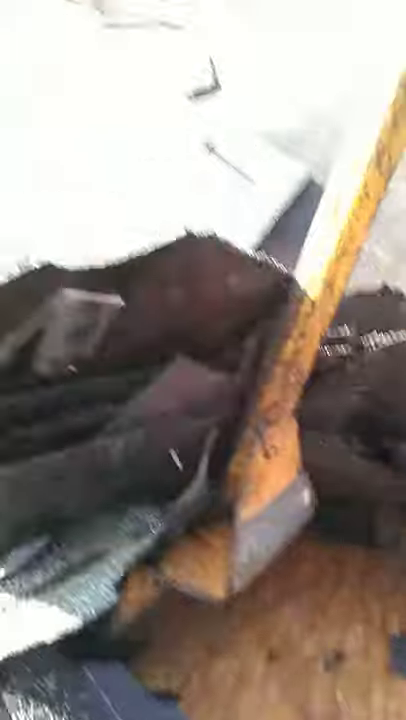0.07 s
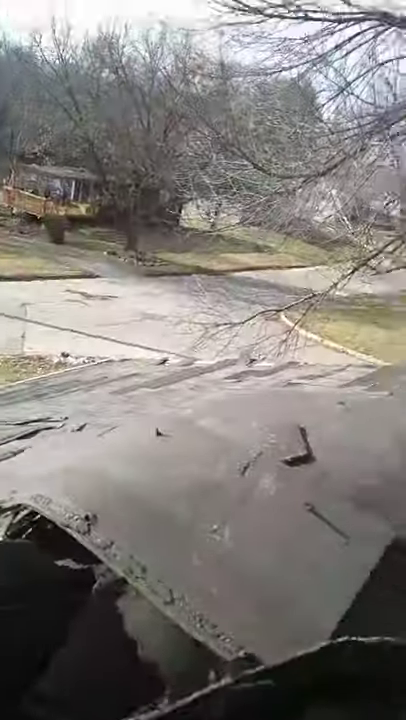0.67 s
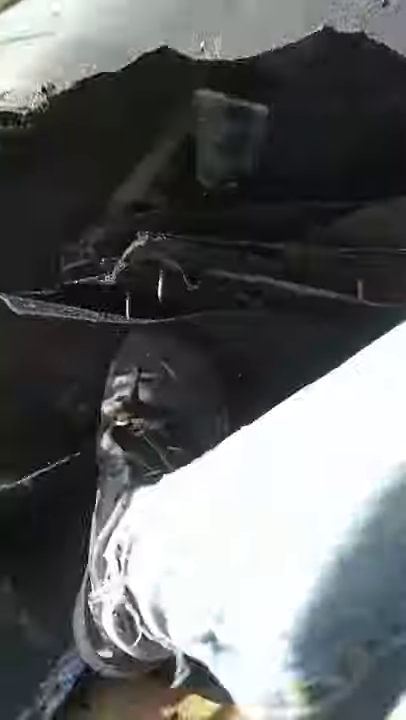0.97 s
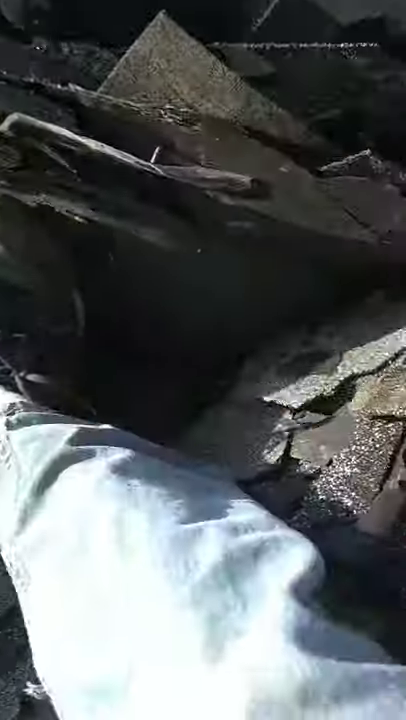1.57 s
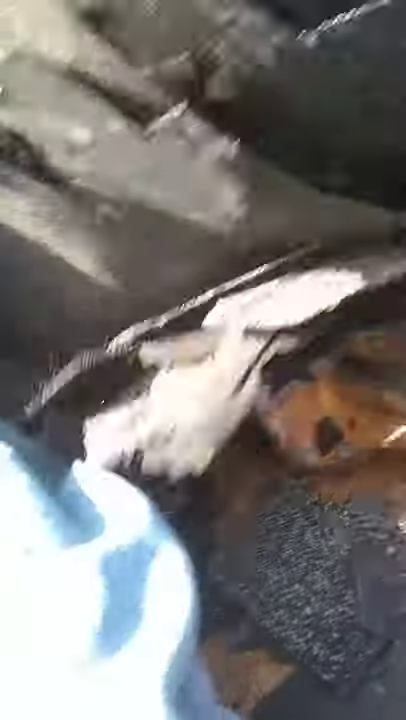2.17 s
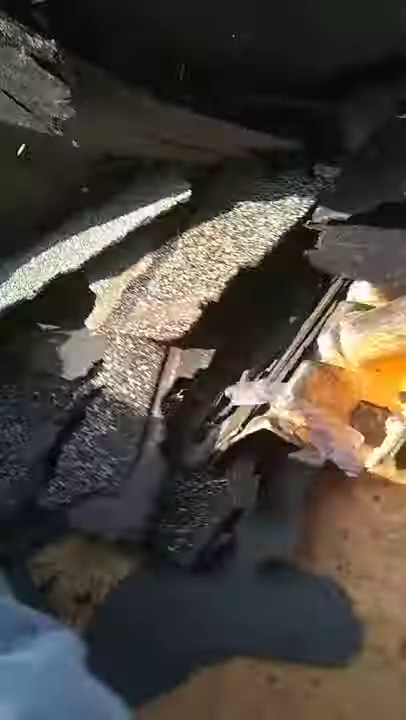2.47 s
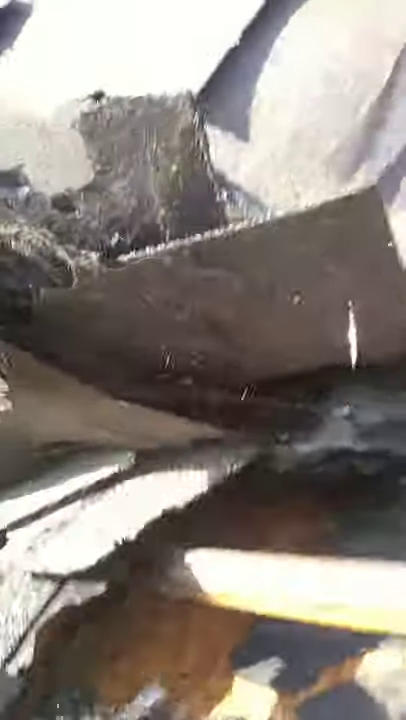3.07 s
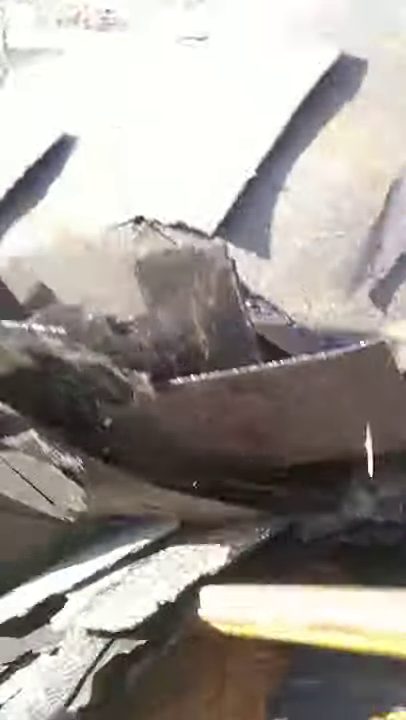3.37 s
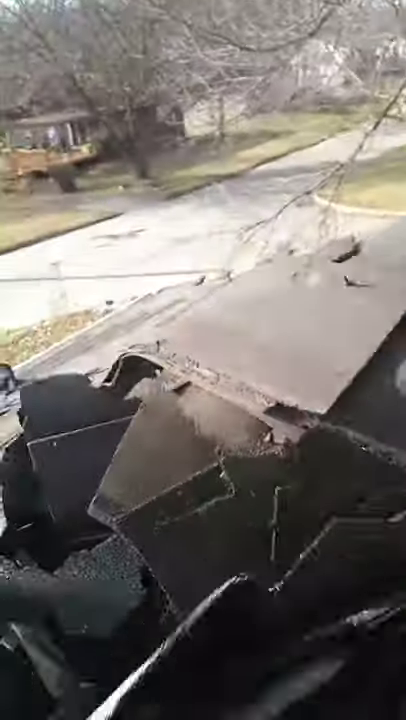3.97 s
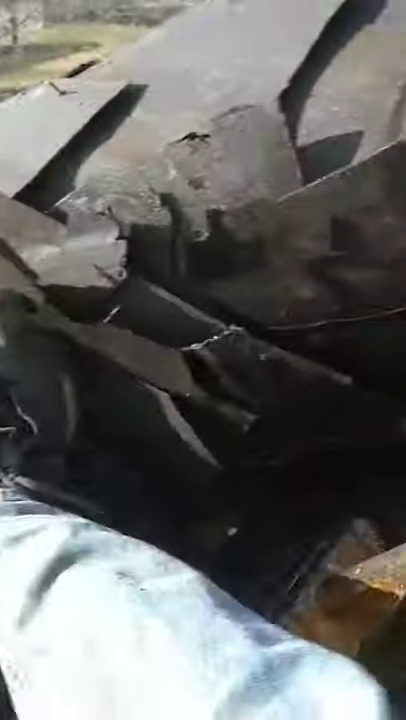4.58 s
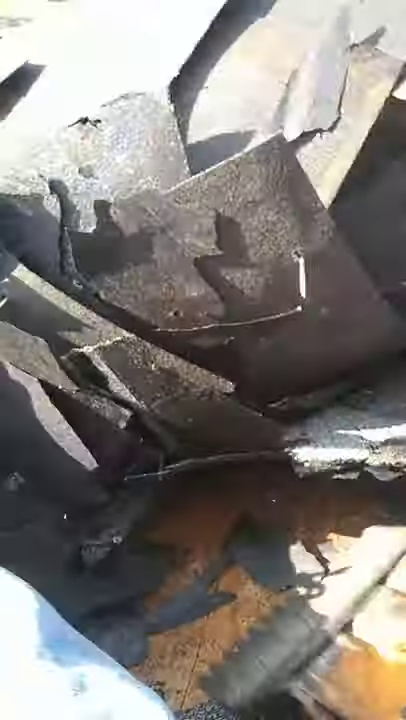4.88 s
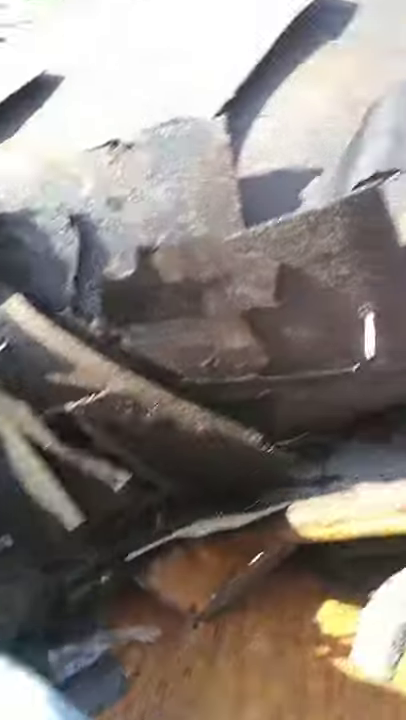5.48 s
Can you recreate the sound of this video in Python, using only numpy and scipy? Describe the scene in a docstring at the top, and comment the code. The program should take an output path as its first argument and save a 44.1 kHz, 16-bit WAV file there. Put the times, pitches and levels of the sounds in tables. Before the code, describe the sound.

Close by, boots scuff and boards thud while a spade rasps under roof shingles, tearing and snapping them and knocking on wood.

```python
"""Old asphalt shingles are pried off a wooden roof deck with a steel spade, close by and outdoors.
First come light shoves, while boots scuff over loose shingles, a mat slides and the boards thud.
From 1.7 s the spade digs in: each shove bites, sticks and slips, and lets go. Mats flex, tear and snap,
grit rasps, and the tool knocks on the deck, hardest near 3.5 s. The blade chatters around 4.6 s, and after
a lull a nail rings at 5.5 s. Two microphone ports of opposite polarity pick up the rubbing and cracking."""
import sys
import numpy as np
from scipy import signal
from scipy.fft import rfft, irfft, next_fast_len
from scipy.io import wavfile
from scipy.ndimage import uniform_filter1d

SR = 44100
rng = np.random.default_rng(int(sys.argv[2]) if len(sys.argv) > 2 else 0)


def wav_out(sig):
    """Save sig, one row per channel (or a flat mono array), as 16-bit PCM at SR to the path in sys.argv[1]."""
    wavfile.write(sys.argv[1], SR, np.round(np.clip(np.atleast_2d(sig).T, -1, 1) * 32767).astype(np.int16))


N = 248724
TIME = np.arange(N) / SR
FFT_SIZE = next_fast_len(N + 4096)
BIN_HZ = np.maximum(np.arange(FFT_SIZE // 2 + 1) * SR / FFT_SIZE, 1)

# shingles snapping: (time [s], grit tick [dB], felt crunch [dB])
SHINGLE_SNAPS = [(0.033, -23, -47), (0.055, -20.5, -40), (0.093, -30, -35), (0.107, -26, -34),
                 (0.12, -23, -36), (.127, -29, -40), (.836, -31, -25), (0.939, -24, -21), (.990, -30, -12),
                 (1.001, -32, -11), (1.017, -27, -20), (1.2018, -19, -41), (1.339, -39, -34),
                 (1.400, -29, -34), (1.471, -26, -20), (1.6708, -23, -22), (1.69, -12.5, -9.5),
                 (1.723, -15, -17), (1.7402, -22, -12), (1.835, -23, -28), (1.8453, -25, -30),
                 (2.012, -33, -23), (2.058, -35, -14), (2.154, -34, -23), (2.185, -23, -15),
                 (2.2013, -28, -17), (2.2452, -42, -13.5), (2.3255, -35, -34), (2.3705, -32, -31),
                 (2.386, -24, -36), (2.4275, -22, -37), (2.466, -16.5, -22), (2.569, -15.5, -12.5),
                 (2.582, -15, -15), (2.6221, -12, -31), (2.6467, -28, -6), (2.6634, -27, -8),
                 (2.702, -28, -19), (2.821, -26.5, -20), (2.9031, -21, -14), (2.9186, -24.5, -13),
                 (2.9395, -29, -23), (3.036, -28, -21), (3.08, -29, -8), (3.097, -21.5, -24),
                 (3.13, -20.5, -13), (3.171, -34, -10), (3.276, -41, -36), (3.295, -33, -42),
                 (3.393, -21.5, -36), (3.409, -30, -36), (3.43, -32, -35), (3.482, -26, -41),
                 (3.7297, -29.5, -21.5), (3.9164, -22, -30), (4.0432, -22, -20), (4.0818, -12.5, -12.5),
                 (4.175, -27, -30), (4.2025, -28, -34), (4.3067, -23, -13), (4.317, -23.5, -12),
                 (4.345, -32, -23), (4.421, -18.5, -15), (4.4345, -30, -30), (4.514, -17, -31),
                 (4.578, -41, -14), (4.612, -36, -5.5), (4.652, -37, -9.5), (4.682, -32, -12),
                 (4.7033, -16, -22), (4.845, -20.5, -15), (4.9408, -10.5, -24), (5.0287, -20, -24),
                 (5.086, -34, -21), (5.481, -18.5, -42), (5.525, -32.5, -54), (5.6266, -16, -14)]


def from_db(db):
    """Decibels as a gain."""
    return 10 ** (np.asarray(db) / 20)


def rms_one(x):
    """Scale a signal to rms 1."""
    return x / np.sqrt(np.mean(x ** 2) + 1e-20)


def level_curve(points):
    """A fader ride in dB, as a gain per sample."""
    return from_db(np.interp(TIME, *np.transpose(points)))


def per_bin(points):
    """A table over frequency, joined on a log axis."""
    hz, value = np.transpose(points)
    return np.interp(np.log(BIN_HZ), np.log(hz), value)


def coloured(x, spectrum):
    """Shape a white signal by a spectrum, keeping its power."""
    gain = rms_one(from_db(per_bin(spectrum)))
    return irfft(rfft(x, FFT_SIZE) * gain, FFT_SIZE)[..., :N]


def resonate(x, hz, width_hz):
    """One resonance with gain 1 at its peak."""
    r = np.exp(-np.pi * width_hz / SR)
    poles = [1, -2 * r * np.cos(2 * np.pi * hz / SR), r * r]
    return signal.lfilter(np.array([1, 0, -1]) * (1 - r * r) / 2, poles, x)


def ring_modes(x, modes):
    """Drive a bank of resonances side by side."""
    return sum(from_db(db) * resonate(x, hz, width_hz) for hz, width_hz, db in modes)


def struck(start, hz, db, t60):
    """A sine that starts suddenly and dies away, cut off after 0.2 s."""
    out = np.zeros(N)
    first = int(start * SR)
    age = TIME[:min(N - first, SR // 5)]
    envelope = from_db(db) * np.exp(-np.log(1000) * age / t60)
    out[first:first + len(age)] = envelope * np.sin(2 * np.pi * hz * age)
    return out


def fade(clicks, t60):
    """Every click starts an exponential decay."""
    return signal.lfilter([1], [1, -from_db(-60 / (t60 * SR))], clicks + 1e-18)


def bursts(times, levels_db, t60):
    """Envelope of sudden releases that die away."""
    clicks = np.zeros(N)
    clicks[np.clip(np.round(times * SR).astype(int), 0, N - 1)] = from_db(levels_db)
    return fade(clicks, t60)


def snapping(times, levels_db, t60, rise_s=0.0036):
    """Envelope of breaks that take a moment to spread across the mat, then die away."""
    return fade(bursts(times, levels_db, t60), rise_s) * np.log(1000) / (rise_s * SR)


def stroke(start, length):
    """Envelope of one smooth push."""
    return np.sqrt(np.abs(np.sin(np.pi * np.clip((TIME - start) / length, 0, 1))))


def wander(per_s):
    """A slow random path between -1 and 1."""
    knots = np.arange(0, TIME[-1] + 1, 1 / per_s)
    return np.interp(TIME, knots, rng.uniform(-1, 1, len(knots)))


def delayed(paths, lag_s):
    """Send each path through a moving delay."""
    return np.array([np.interp(TIME - lag_s, TIME, path) for path in paths])


def grains(per_s):
    """Tiny fractures at random moments, on four paths to the ports; power 1."""
    chance = np.clip(per_s / SR, .001, 1)
    return rng.standard_normal((4, N)) * (rng.random((4, N)) < chance) / np.sqrt(chance)


def stick_slip(per_s, spread_db, t60, steady):
    """Force of uneven slips on top of steady sliding; rms about 1."""
    sizes = from_db(spread_db * np.minimum(rng.exponential(1, N), 3))
    slips = rms_one(fade(sizes * (rng.random(N) < per_s / SR), t60))
    power = slips ** 2 + steady ** 2
    return np.sqrt(power / uniform_filter1d(power, size=2200))


def crackle(per_s, pops_per_s, pop_db, spread_db=1):
    """Dense fine grinding, with granules of uneven size cracking out of it."""
    sizes = from_db(spread_db * np.minimum(rng.exponential(1, N), 2))
    pops = rms_one(fade(sizes * (rng.random(N) < pops_per_s / SR), t60=0.0049))
    return grains(per_s) + from_db(pop_db) * pops * grains(20000)


def spade_shoves(attack_s=0.02, release_t60=0.084):
    """Each shove bites, swells or eases, and lets go: the drive on felt, coarse grit, fine grit, deck."""
    # (start [s], length [s], force [dB], swell [dB], grit [dB], fine over coarse [dB], deck bearing [dB])
    shoves = [ (0, 0.19, -37.5, -2, -1, -3.5, -12), (0.093, 0.025, -37.5, 3, 6.5, 14, -19),
              (0.19, 0.22, -41.5, -9, -3, -8, -5.5), (0.599, 0.26, -38.5, -0.5, 5.5, 5, -3.5),
              (0.88, 0.24, -36, 0.5, 2, -4.5, -2.5), (1.024, 0.079, -38, -4, -3, 7, -1),
              (1.141, 0.3, -34.5, -2, -1, -3, -7.5), (1.456, 0.19, -40, -2, -2, -5.5, -5),
              (1.658, 0.088, -27.5, 14, -1, -11.5, -10), (1.76, 0.039, -16.5, 1.5, -4.5, -6, -3),
              (1.801, 0.11, -51.5, 4, 0, -2, -3), (1.93, 0.039, -52, 11.5, 9.5, 2, 0),
              (2.02, 0.076, -32, 6.5, 3.5, 1.5, -9), (2.029, 0.18, -33, 4.5, -0.5, -2, -2),
              (2.264, 0.058, -35.5, 3.5, 2.5, -1.5, -10.5), (2.325, 0.07, -38.5, 11.5, -1, 0, -3),
              (2.415, 0.049, -30.5, 21.5, -6.5, -14, -6.5), (2.478, 0.066, -34, 1, -0.5, -8, -6.5),
              (2.571, 0.07, -31.5, 0.5, 1.5, -14, -3), (2.632, 0.068, -21.5, 10.5, -2.5, -8, -6),
              (2.701, 0.024, -20.5, -2, -1.5, -3, -2), (2.748, 0.15, -47, -13, -2, 2, -15),
              (2.9, 0.13, -39.5, -8, 0.5, -3, 1.5), (3, 0.2, -31, 0.5, 0, -3, -6.5),
              (3.24, 0.29, -36, 9, -3.5, -5.5, -6), (3.515, 0.22, -39, -3, -4, -6, -5),
              (3.75, 0.33, -40.5, 3, -2, -2.5, -9), (3.895, 0.041, -40, -1, 4, -4, -3),
              (4.049, 0.043, -28, 5, 0.5, 0.5, -13), (4.095, 0.28, -32.5, -7.5, -2, -4, -14.5),
              (4.296, 0.3, -33, 3.5, -7.5, -3.5, -6), (4.511, 0.23, -31.5, 14, -2.5, -7, -7),
              (4.704, 0.05, -35, -2, 6, 2, -12), (4.733, 0.13, -29, -4, -4, -5, -13),
              (4.869, 0.072, -28, 7.5, 0.5, -1, -0.5), (4.945, 0.067, -30, 5, 3.5, -6.5, -1),
              (5.007, 0.012, -17.5, -3.5, -6, -2.5, 4), (5.016, 0.075, -40, 5, -1, -10, -7),
              (5.099, 0.12, -53, -14, -0.5, -2, -10), (5.244, 0.054, -40, 8, 0, -4.5, -1),
              (5.45, 0.027, -50, -7, 0.5, 4, -11), (5.486, 0.0053, -38, -14.5, 11, 2, 2.5),
              (5.597, 0.031, -38, -3, 1.5, -11, 5)]
    power = np.zeros((4, N))
    for start, length, force_db, swell_db, grit_db, fine_db, bearing_db in shoves:
        span = slice(*np.searchsorted(TIME, [start - attack_s, start + length + release_t60]))
        age = TIME[span] - start
        bite = np.clip(age / attack_s + .5, 0, 1)
        hold_db = swell_db * (np.clip(age / length, 0, 1) - .5)
        release_db = -60 * np.maximum(age - length, 0) / release_t60
        shares = from_db([0, grit_db - fine_db / 2, grit_db + fine_db / 2, bearing_db])
        power[:, span] += np.outer(shares, bite * from_db(force_db + hold_db + release_db)) ** 2
    return np.sqrt(power)


def rasping_grit(coarse, fine):
    """Granules grind and pop against the blade; a snap crushes many at once, and crumbs trail after."""
    # tone of the coarse and of the fine grit: (frequency [Hz], level [dB])
    coarse_colour = [(1200, -18), (2300, 8.5), (2800, 12.5), (3500, -3), (4000, 5.5), (4500, 8.5),
                     (5600, 3.5), (6500, 2.5), (9000, -12)]
    fine_colour = [(4000, -29), (6500, 3), (8000, 3.5), (9000, 4), (10000, -2), (11300, 4.5), (12500, -4.5),
                   (14300, -11)]
    # the steel blade singing under the grit: (frequency [Hz], width [Hz], level [dB])
    blade_modes = [(3604, 325, 7.5), (4400, 22, 3.5), (5540, 45, -1), (9520, 440, 3.5), (10080, 140, 9)]
    times, tick_db, _ = np.transpose(SHINGLE_SNAPS)
    force = stick_slip(per_s=200, spread_db=4.0, t60=0.048, steady=1.43)
    grind = crackle(per_s=9000, pops_per_s=110, pop_db=-7.0) * force * from_db(-1.2)
    crack = snapping(times, tick_db, t60=0.0076) * from_db(-0.5)
    crumbs = snapping(times, tick_db, t60=0.05) * from_db(-7.5)
    crush = grains(16000) * (crack + crumbs)
    big = coloured(grind * coarse * from_db(-4.5) + crush * from_db(-4.0), coarse_colour)
    small = coloured(grind * fine * from_db(-2) + crush * from_db(-4.5), fine_colour)
    grit = big + small
    return grit + ring_modes(grit, blade_modes) * from_db(-1.0) + edge_rasp(grit)


def edge_rasp(grit, wander_s=0.001596):
    """The scraping edge picks one band out of the grit; its wandering path bends the pitch."""
    band = resonate(grit, hz=3453, width_hz=70)
    return from_db(13.5) * delayed(band, wander_s * wander(14))


def tearing_felt(tear):
    """Fibres give way in small clusters, and all at once in a snap."""
    # tone of the tearing: (frequency [Hz], level [dB])
    felt_colour = [(350, -5), (650, 1.5), (850, 2.5), (1250, 4.5), (1560, 4), (1900, 2), (2400, -4.5),
                   (3200, -4), (7000, -48)]
    times, _, crunch_db = np.transpose(SHINGLE_SNAPS)
    force = stick_slip(per_s=260, spread_db=1.5, t60=0.0093, steady=1.0)
    snap = snapping(times, crunch_db, t60=0.016) * from_db(-5.5)
    fibres = coloured(grains(5000) * (tear * force * from_db(-1.5) + snap), felt_colour)
    return hollow_gap(fibres, gap_s=.0022, echo=.45)


def hollow_gap(x, gap_s, echo):
    """The gap under a lifted mat adds a short echo whose notches shift as it bends."""
    lag_s = gap_s * (1 + .35 * wander(9))
    return (x + echo * delayed(x, lag_s)) / np.sqrt(1 + echo ** 2)


def deck_knocks():
    """Each blow is a crack and a short hollow ring whose pitch depends on where the blade bears."""
    # the tool hits the deck: (time [s], ring [dB], pitch [Hz], crack [dB], ring t60 [s])
    blows = [(0.09, -9, 560, -33, 0.014), (0.477, -8.5, 450, -31.5, 0.033), (0.94, -8.5, 550, -38, 0.029),
             (1.783, -8, 540, -14.5, 0.026), (1.7961, -3, 573, -26, 0.094), (2.0104, -6, 666, -29, 0.013),
             (2.6865, -7, 587, -17.5, 0.18), (2.702, -4, 534, -24, 0.023), (3.009, -5.5, 530, -46, 0.033),
             (3.038, -10, 635, -35, .02), (3.0538, -11.5, 593, -38, 0.032), (3.135, -6.5, 422, -40, 0.0095),
             (3.1474, -10.5, 625, -34, 0.015), (3.1718, -13, 524, -42, 0.015),
             (3.511, -16, 536, -14.5, 0.17), (3.518, 1.5, 550, -13, 0.058), (3.628, -3.5, 590, -8, 0.074),
             (4.635, -10.5, 640, -29, 0.044), (5.0057, -3, 547, -23, 0.063), (5.456, -23, 895, -45, 0.02),
             (5.606, -5.5, 511, -25, 0.079)]
    # partials of a knock: (multiple of its pitch, level [dB], share of its ring time)
    modes = [(.5, -25, 1), (1.0, -1.5, 0.65)]
    # tone of the crack: (frequency [Hz], level [dB])
    crack_colour = [(100, -0.5), (400, 7.5), (950, 6.5), (1700, 3.5), (3500, -1.0), (6000, -2.5),
                    (9000, -5.5), (14000, -18.0)]
    ring = sum(struck(start, hz * multiple, db + mode_db, t60 * share)
               for start, db, hz, _, t60 in blows for multiple, mode_db, share in modes)
    low_cut = signal.butter(2, 210, "high", fs=SR, output="sos")   # the ring carries no deep bass
    times, _, _, crack_db, _ = np.transpose(blows)
    crack = grains(20000) * bursts(times, crack_db + 4, t60=.025)
    return coloured(crack, crack_colour), signal.sosfilt(low_cut, ring + 1e-18)


def boards_and_mats(bearing):
    """Shifting weight thumps the boards and, with the bearing spade, flexes the mats; thuds jolt both."""
    # weight shifting on the loose shingles: (time [s], level [dB])
    weight_ride = [(0, -52), (.06, -24), (.17, -33), (.27, -22.5), (.39, -25.5), (.52, -20), (.66, -27),
                   (.8, -21.5), (.9, -29), (1.17, -37.5), (1.45, -30), (1.72, -32.5), (1.9, -40.5),
                   (2.08, -33), (2.82, -41), (3.05, -41.5), (3.64, -29), (3.77, -43.5), (4.3, -43.5),
                   (4.9, -43), (5.17, -51.5), (5.6, -41)]
    # the boards give: (time [s], level [dB])
    thuds = [(0.058, -27), (0.227, -26), (0.421, -25), (.515, -28), (0.553, -31), (0.879, -16),
             (0.937, -20), (1.074, -14), (1.112, -15.5), (1.442, -14.5), (1.589, -23.5), (1.695, -28),
             (1.793, -9.5), (2.004, -17), (2.452, -22), (2.515, -25), (2.724, -15.5), (2.884, -17.5),
             (2.934, -19.5), (3.362, -22), (3.648, -15.5), (4.34, -27), (5.008, -13), (5.244, -23.5)]
    # tone of the boards and of the mats: (frequency [Hz], level [dB])
    board_colour = [(15, -29), (40, -7), (90, 0.5), (170, 1.5), (250, -15), (400, -10.5), (900, -56)]
    mat_colour = [(100, -42), (200, -1.5), (290, -7.5), (400, -10), (480, -14.5), (700, -22), (1200, -34.5),
                  (3000, -46.5)]
    # the tool ringing against the deck: (frequency [Hz], width [Hz], level [dB])
    deck_modes = [(132, 103, -3.5), (277, 63.5, 3), (492, 109, 0), (558, 45, -7.5), (689, 126, -8.5)]
    weight = level_curve(weight_ride)
    force = stick_slip(per_s=150, spread_db=0.5, t60=0.044, steady=0.51)
    jolt = bursts(*np.transpose(thuds), t60=0.14)
    thump = force * weight * from_db(1)
    flex = force * np.hypot(weight * from_db(0.5), bearing * from_db(-9))
    press = force * np.hypot(weight * from_db(-1.5), bearing * from_db(20.5))
    boards = coloured(grains(8000) * np.hypot(thump, jolt), board_colour)
    mats = coloured(grains(6000) * np.hypot(flex, jolt * from_db(-1)), mat_colour)
    slips = grains(3000)[0] * np.hypot(press, jolt * from_db(-7.5))
    return boards + mats, ring_modes(slips, deck_modes)


def nail_pings():
    """The blade catches a nail and it rings briefly."""
    # partials of steel on nail: (time [s], frequency [Hz], level [dB], t60 [s])
    pings = [(1.6917, 9730, -13, .025), (1.741, 9950, -14.5, 0.064), (1.790, 3110, -19, 0.038),
             (3.5185, 1400, -9.5, 0.015), (3.629, 1590, -10, 0.023), (3.631, 1150, -14, 0.024),
             (3.629, 6110, -10.5, 0.02), (3.630, 5520, -9.5, 0.013), (3.731, 5120, -27.5, .025),
             (5.481, 12250, -31, 0.11), (5.481, 3720, -28, 0.05), (5.482, 10120, -25, 0.04),
             (5.481, 8370, -23, 0.039), (5.482, 7130, -29, .045), (5.482, 7700, -25, .045),
             (5.481, 5370, -46, 0.32), (5.481, 6600, -40, 0.22), (5.481, 3220, -43, .2)]
    return sum(struck(start, hz, db, t60) for start, hz, db, t60 in pings)


def blade_chatter():
    """Under load the blade chatters in one narrow resonance, which glides as the angle changes."""
    # (start [s], length [s], start pitch [Hz], end pitch [Hz], level [dB])
    squawks = [(2.646, 0.0082, 1590, 1550, -15), (2.658, 0.029, 1635, 1527, -22),
               (4.587, 0.2, 3480, 3610, -31.5), (4.603, 0.096, 1600, 1490, -32),
               (4.841, .018, 3730, 3700, -28.5), (4.88, 0.093, 3710, 3580, -34),
               (4.896, 0.042, 1540, 1430, -33)]
    out = np.zeros(N)
    for start, length, from_hz, to_hz, db in squawks:
        ring = resonate(rng.standard_normal(N), from_hz, width_hz=41)
        ring /= np.sqrt(uniform_filter1d(ring ** 2, size=900) + 1e-12)   # even out the level
        bend = (to_hz / from_hz - 1) * np.clip((TIME - start) / length, 0, 1)
        glide = np.interp(TIME + np.cumsum(bend) / SR, TIME, ring)
        out += from_db(db) * stroke(start, length) * glide
    return out


def flying_chips(coarse, fine, per_s=300, low_hz=2900, high_hz=12550, spread_db=4, t60=0.01):
    """Single granules tick against the steel, each at its own pitch: coarse grit low, fine grit high."""
    when, pitch, size, route = rng.random((int(per_s * N / SR), 4)).T
    age = TIME[:SR // 50]
    start = (when * (N - len(age))).astype(int)
    hz = low_hz + (high_hz - low_hz) * pitch
    size_db = spread_db * np.minimum(-np.log(size), 3)
    strength = 2 * from_db(size_db - 2) * (coarse[start] * (1 - pitch) + fine[start] * pitch)
    ticks = strength[:, None] * np.exp(-np.log(1000) * age / t60) * np.sin(2 * np.pi * np.outer(hz, age))
    out = np.zeros((4, N))
    path = (route * len(out)).astype(int)
    np.add.at(out, (path[:, None], start[:, None] + np.arange(len(age))), ticks)
    return out


def boot_steps():
    """The sole slaps a mat onto the deck: a dead clap with neither bass nor edge."""
    # a boot is set down: (time [s], level [dB])
    steps = [(0.9898, -0.5), (1.118, -8), (1.459, -20), (1.634, -20.5), (2.8872, -20)]
    # partials of the slap: (frequency [Hz], level [dB], t60 [s])
    modes = [(356, -11, 0.024), (626, -4.5, 0.023), (796, -2.5, 0.017), (1035, -3.5, 0.014),
             (1240, -23, 0.025)]
    slap = sum(struck(start, hz, db + mode_db, t60) for start, db in steps for hz, mode_db, t60 in modes)
    return signal.sosfilt(signal.butter(3, [250, 1400], "band", fs=SR, output="sos"), slap + 1e-18)


def boot_scuffs():
    """The sole sticks and slips over hollow-lying shingles."""
    # drags of the boot: (start [s], length [s], level [dB])
    scuffs = [(0.277, 0.055, -31.5), (0.47, 0.1, -24.5), (0.582, 0.062, -25.5), (0.679, 0.042, -26.5),
              (0.715, 0.11, -23.5)]
    # the shingles under the sole: (frequency [Hz], half-width of each filter pass [Hz], level [dB])
    modes = [(240, 90, -9.5), (369, 133, 4.5), (557, 134, -1), (804, 110, -17)]
    push = sum(from_db(db) * stroke(start, length) for start, length, db in scuffs)
    slips = grains(2500)[0] * stick_slip(per_s=180, spread_db=0.0, t60=0.024, steady=0.36)
    body = sum(from_db(db) * resonate(resonate(slips, hz, 2 * half_width), hz, 2 * half_width)
               for hz, half_width, db in modes)
    return push * rms_one(body)


def sliding_mat():
    """A mat slides over grit: a short hiss that sings in two broad resonances."""
    # swell of the slide: (time [s], level [dB])
    slide_ride = [(.585, -57), (.605, -26.5), (.66, -27.5), (.70, -21.5), (.745, -36), (.83, -37),
                  (.9, -50)]
    # its resonances: (frequency [Hz], width [Hz], level [dB])
    modes = [(3500, 410, 8.5), (5220, 780, 7.5)]
    return level_curve(slide_ride) * rms_one(ring_modes(grains(15000), modes))


def outdoor_air():
    """A faint hush under everything."""
    # tone of the air: (frequency [Hz], level [dB])
    air_colour = [(30, -72), (200, -53), (1000, 14), (4000, 0), (14000, 4.5)]
    return from_db(-54) * coloured(rng.standard_normal((4, N)), air_colour)


def microphone_ports(paths, left_lag_s=.000453, right_lag_s=.00042):
    """Sound from either side reaches the far port late; scattered sound reaches each port alone."""
    # diffuse sound: (frequency [Hz], share that is scattered)
    scatter_shares = [(50, .035), (200, .07), (400, .05), (700, .01), (1150, .003), (2280, .004),
                      (3400, .04), (4600, .11), (5700, .28), (7500, .47), (10000, .35), (14000, .47)]
    # direct sound: (frequency [Hz], share that comes from the left)
    left_shares = [(100, .55), (330, .72), (900, .4), (1700, .22), (4200, .2), (5600, .3), (7000, .72),
                   (9000, .85), (14000, .75)]
    # tone of one port against the other: (frequency [Hz], left minus right [dB])
    port_balance = [(100, 1.2), (400, 1.6), (600, 1.2), (1100, 0), (1550, 2.8), (2050, 0), (2550, 0),
                    (4200, -2.2), (6500, -2.5), (10000, 2.6), (13000, -1)]
    from_left, from_right, *scatter = rfft(paths, FFT_SIZE)
    scattered = np.clip(per_bin(scatter_shares), 0, 1)
    leftward = np.clip(per_bin(left_shares), 0, 1)
    left = from_left * np.sqrt((1 - scattered) * leftward)
    right = from_right * np.sqrt((1 - scattered) * (1 - leftward))
    left_delay, right_delay = np.exp(-2j * np.pi * np.outer([left_lag_s, right_lag_s], BIN_HZ))
    direct = np.array([left + right * right_delay, -(left * left_delay + right)])   # right port inverted
    diffuse = np.sqrt(scattered) * np.array(scatter)
    balance = from_db(np.outer([.5, -.5], per_bin(port_balance)))
    return irfft((direct + diffuse) * balance, FFT_SIZE)[:, :N]


def scene():
    """Rubbing and cracking come through the ports; deck, boots, nails and chatter sit near the middle."""
    tear, coarse, fine, bearing = spade_shoves()
    flexing, tool_ring = boards_and_mats(bearing)
    knock_crack, knock_ring = deck_knocks()
    shingles = tearing_felt(tear) + rasping_grit(coarse, fine) + flying_chips(coarse, fine)
    paths = shingles + flexing + sliding_mat() + knock_crack + outdoor_air()
    wood = signal.cheby1(8, 1, 1720, fs=SR, output="sos")   # the deck passes no treble
    deck = signal.sosfilt(wood, tool_ring + knock_ring + boot_scuffs() + boot_steps())
    deck_pan = from_db([0.5, -0.5])   # a touch to the left
    return microphone_ports(paths) + np.outer(deck_pan, deck) + nail_pings() + blade_chatter()


def record(dry, cutoff_hz=14250):
    """A soft clip rounds off the hardest blows; a steep low-pass cuts the top."""
    rounded = dry / (1 + dry ** 8) ** (1 / 8)
    return signal.sosfilt(signal.ellip(10, .1, 80, cutoff_hz, fs=SR, output="sos"), rounded)


dry = scene()
out = record(dry)
wav_out(out)
```